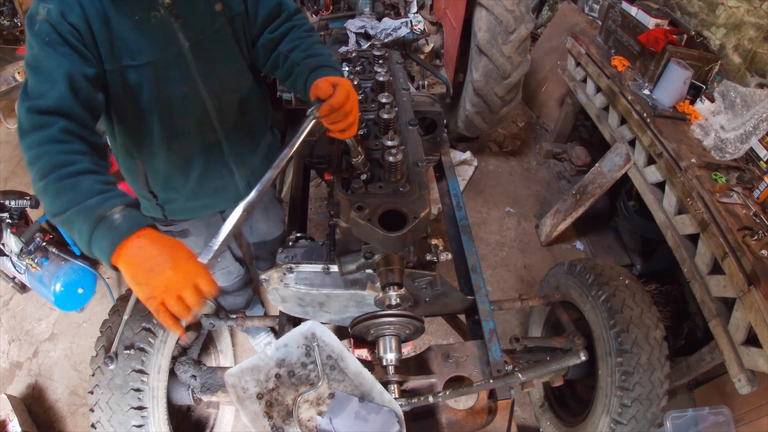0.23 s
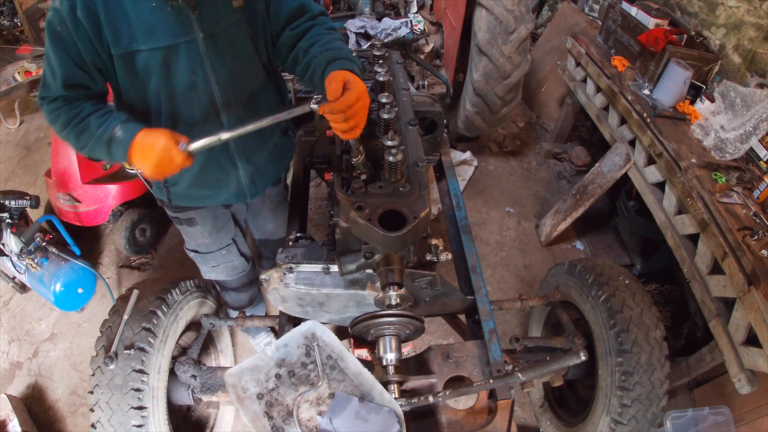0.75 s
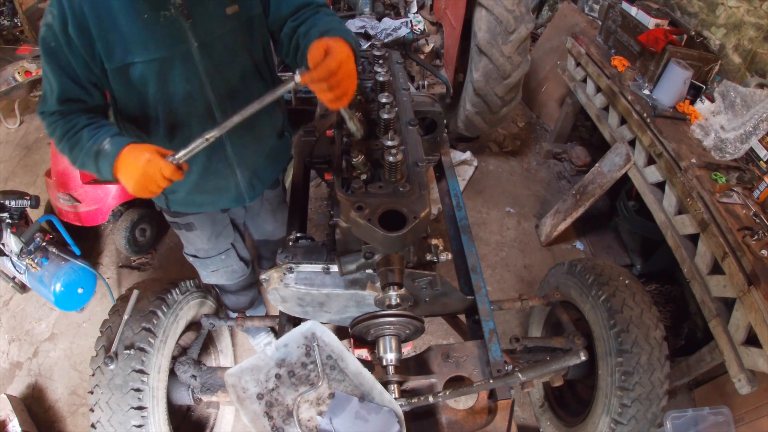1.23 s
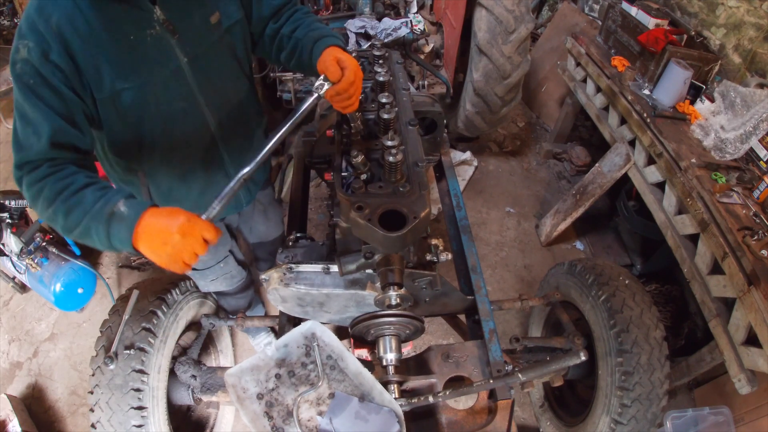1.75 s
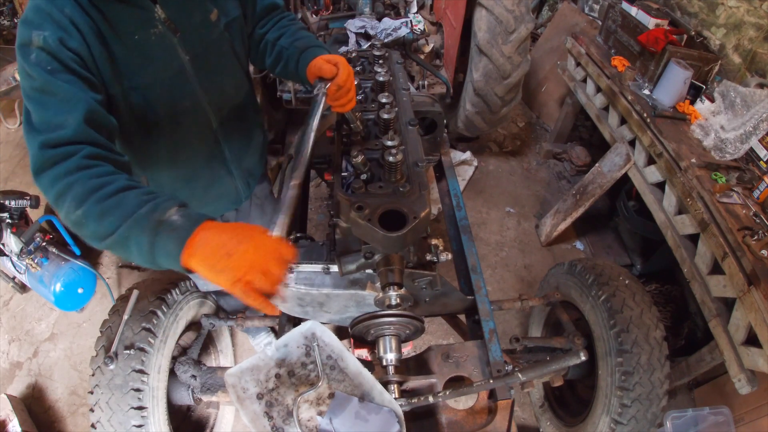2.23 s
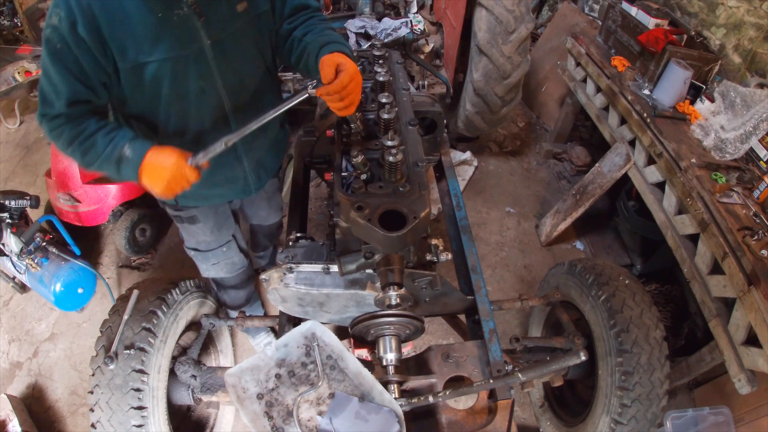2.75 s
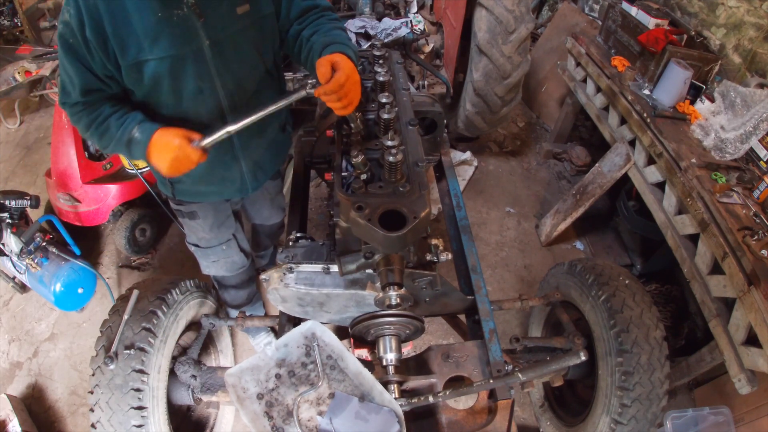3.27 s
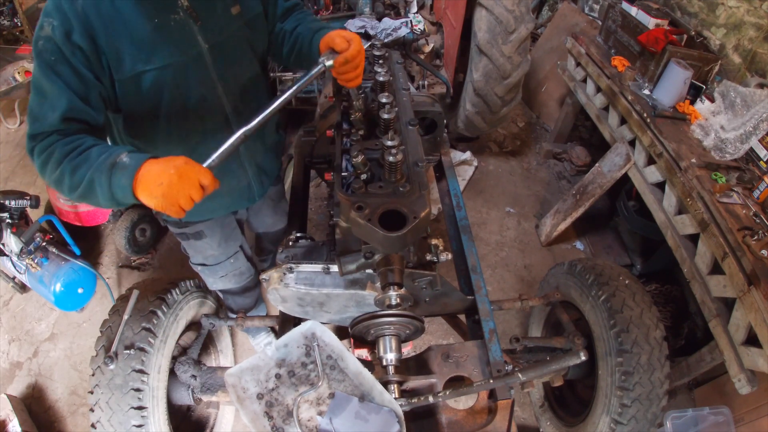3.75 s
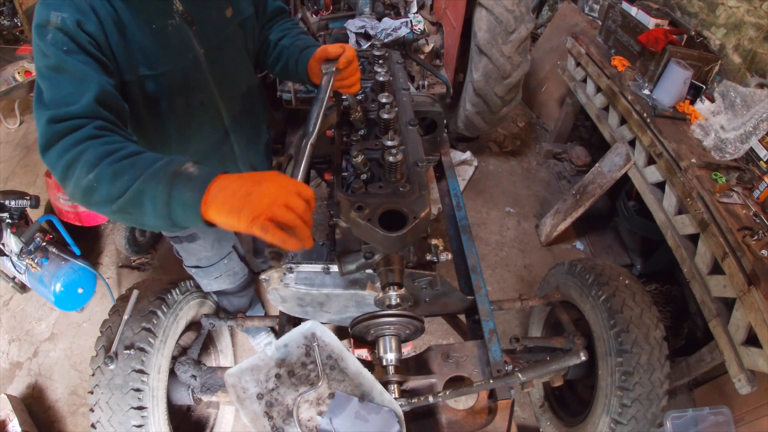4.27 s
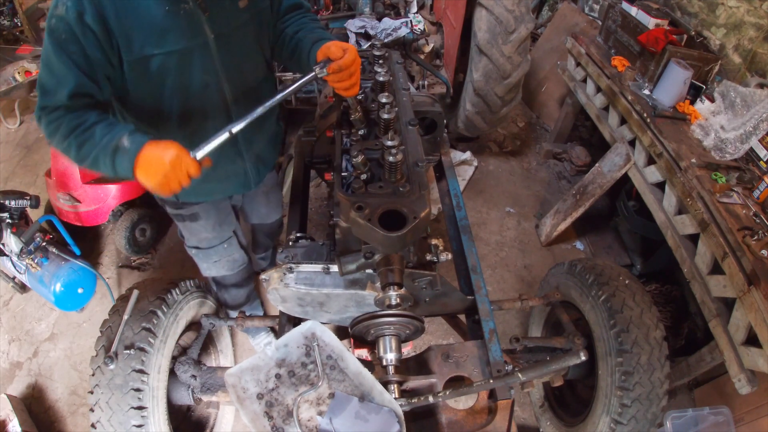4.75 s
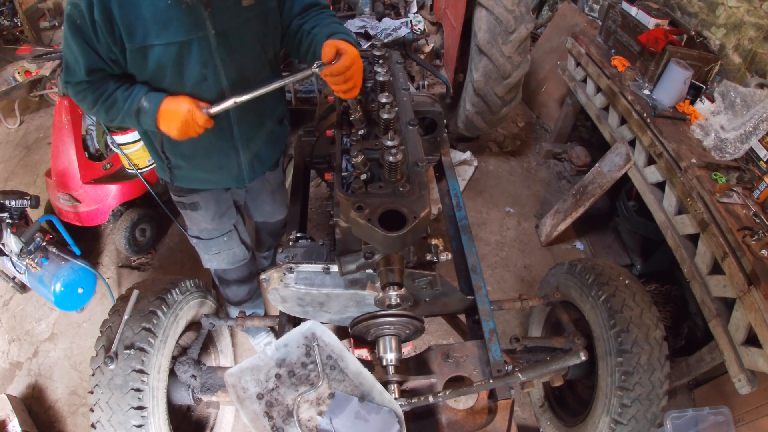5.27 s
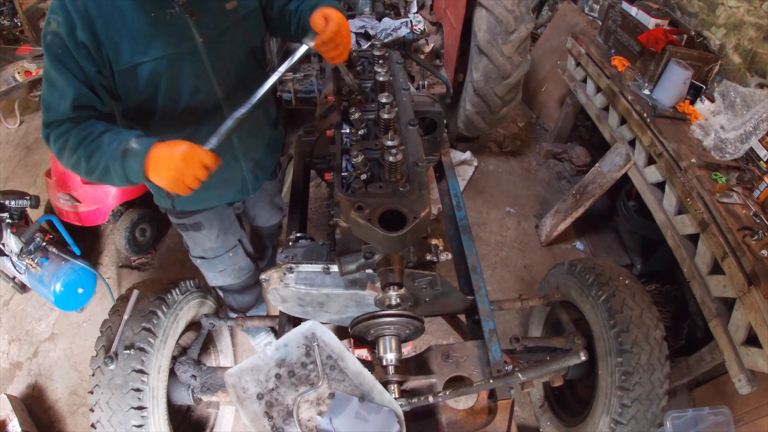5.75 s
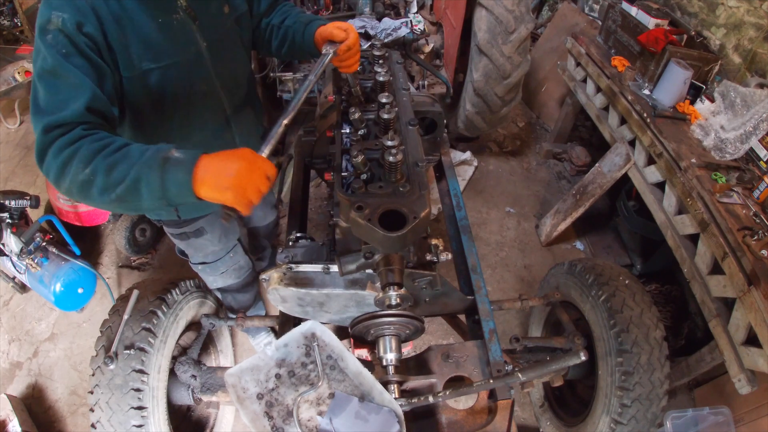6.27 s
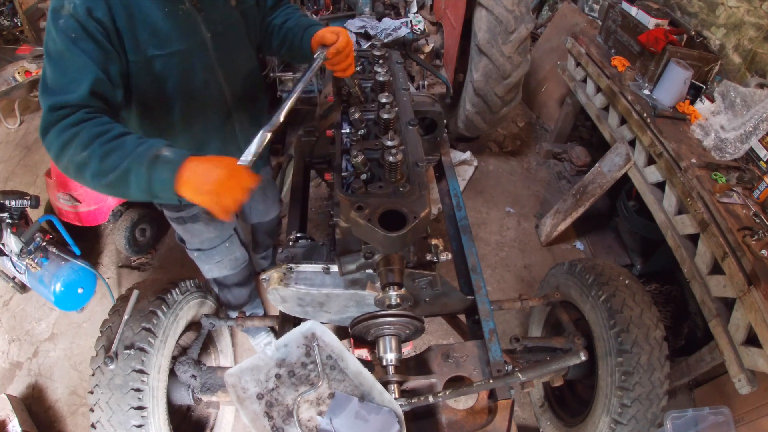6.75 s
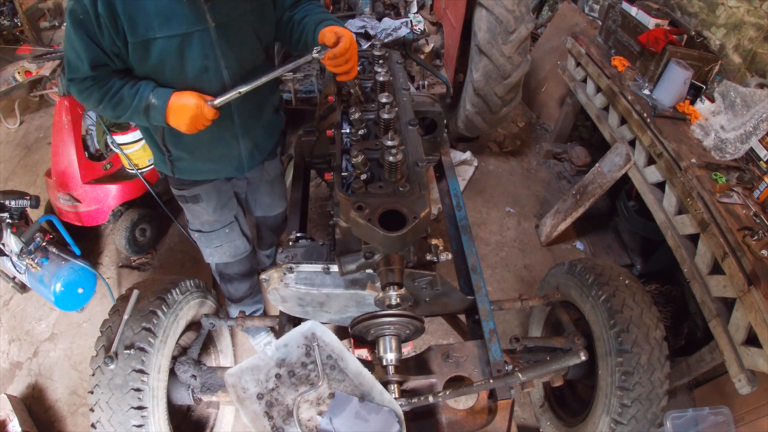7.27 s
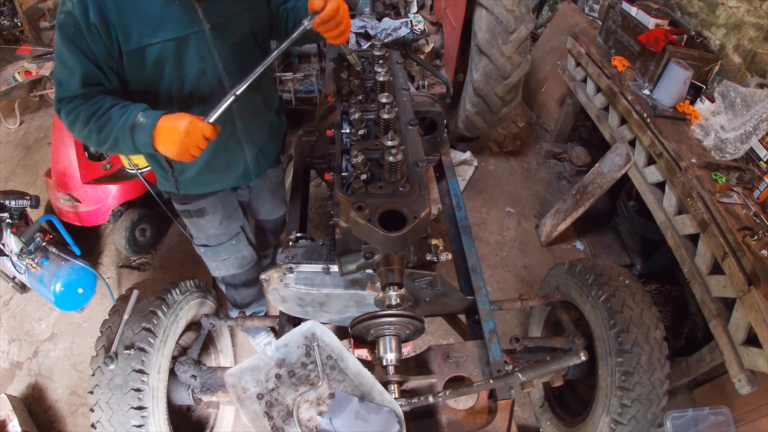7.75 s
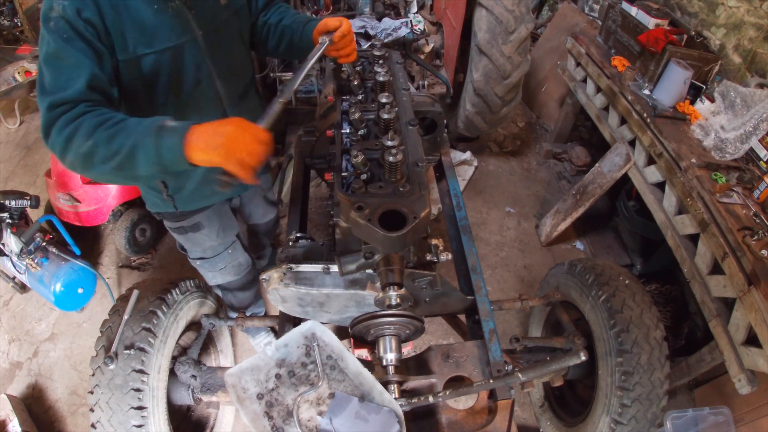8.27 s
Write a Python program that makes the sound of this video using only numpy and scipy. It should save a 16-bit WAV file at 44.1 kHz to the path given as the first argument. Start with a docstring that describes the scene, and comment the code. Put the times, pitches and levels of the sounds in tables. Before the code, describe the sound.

Steel clicks and crunchy clinks come in five short bursts as a socket is set on engine nuts and a long wrench ratchets and clicks over. Dull booms from the chassis sit under many of the hits, and soft cloth rustle fills the pauses. The work is heard from a couple of steps away in a shed with a short echo, with thin falling bird whistles, light hiss and very faint high ticking behind.

```python
"""A long torque wrench tightens the head nuts of a tractor engine in a shed, two steps away.
The socket clinks onto each nut, the ratchet takes up and the wrench clicks over: steel contacts that
crunch, ring and echo. The jolts boom through the chassis, and a sleeve rustles as the arm swings.
Small birds whistle outside, over open-air hiss and a faint high ticking; a low tone wavers once."""
import sys
import numpy as np
from scipy import signal
from scipy.fft import rfft, irfft, next_fast_len
from scipy.io import wavfile
from scipy.ndimage import uniform_filter1d

SR = 44100
rng = np.random.default_rng(int(sys.argv[2]) if len(sys.argv) > 2 else 0)


def wav_out(sig):
    """Save sig, one row per channel (or a flat mono array), as 16-bit PCM at SR to the path in sys.argv[1]."""
    wavfile.write(sys.argv[1], SR, np.round(np.clip(np.atleast_2d(sig).T, -1, 1) * 32767).astype(np.int16))


N = 375320
T = np.arange(N) / SR


def undb(db):
    """Decibels to gain."""
    return 10 ** (np.asarray(db) / 20)


def unit_rms(x):
    """Scale to rms 1."""
    return x / np.sqrt(np.mean(x ** 2))


def unit_energy(x):
    """Scale to energy 1."""
    return x / np.sqrt(np.sum(x ** 2))


def add(out, x, start_s):
    """Mix x into out from start_s."""
    i = max(0, int(start_s * SR))
    out[i:i + len(x)] += x[:N - i]


def decay(t, t60_s):
    """Exponential fall, 60 dB in t60_s."""
    return np.exp(-np.log(1000) * t / t60_s)


def wander(rate_hz):
    """Random steps, smoothed twice; spread near 1."""
    hold = int(SR / rate_hz)
    steps = np.repeat(rng.standard_normal(N // hold + 1), hold)
    return 1.3 * uniform_filter1d(uniform_filter1d(steps, hold), hold)[:N]


def band_centres(edges_hz):
    """Geometric centre of each band."""
    return np.sqrt(np.multiply(edges_hz[1:], edges_hz[:-1]))


def db_at(hz, curve):
    """Read a (Hz, dB) curve on a log-frequency axis."""
    knots_hz, db = np.transpose(curve)
    return np.interp(np.log(hz), np.log(knots_hz), db)


def colour(x, curve):
    """Minimum-phase filter along a (Hz, dB) curve."""
    size = 2 * next_fast_len(len(x) // 2 + 1024)
    gain_db = db_at(np.fft.rfftfreq(size, 1 / SR) + 1, curve)
    cepstrum = irfft(np.log(undb(gain_db)))
    cepstrum[1:size // 2] *= 2
    cepstrum[size // 2 + 1:] = 0
    return irfft(rfft(x, size) * np.exp(rfft(cepstrum)))[:len(x)]


def set_bands(x, edges_hz, levels_db):
    """Filter a blow towards the given band levels (energy spread over 50 ms)."""
    edge_bins = np.array(edges_hz) * len(x) // SR
    for _ in range(2):
        power_below = np.cumsum(np.abs(rfft(x)) ** 2) * 2 / len(x) / (.05 * SR)
        have_db = 10 * np.log10(np.diff(power_below[edge_bins]))
        x = colour(x, np.c_[band_centres(edges_hz), levels_db - have_db])
    return x


def resonate(x, hz, width_hz):
    """Two-pole resonance, gain 1 at its centre."""
    return signal.lfilter(*signal.iirpeak(hz, hz / width_hz, fs=SR), x)


def ring(t, modes, scatter_db, detune):
    """Decaying modes; each blow lands elsewhere and shifts their strength and pitch a little."""
    hz, db, t60_s = np.transpose(modes)[:, :, None]
    strength, shift = rng.standard_normal((2, len(modes), 1))
    sines = np.sin(2 * np.pi * hz * (1 + detune * shift) * t)
    return np.sum(undb(db + scatter_db * strength) * decay(t, t60_s) * sines, axis=0)


def shed_echoes(t, contact_s, split_hz=2000, onset_s=.005):
    """A few strong echoes off engine and floor, then a dense tail whose treble dies first."""
    low = signal.sosfilt(signal.butter(2, split_hz, fs=SR, output="sos"), rng.standard_normal(len(t)))
    highpass = signal.butter(2, split_hz, "high", fs=SR, output="sos")
    high = signal.sosfilt(highpass, rng.standard_normal(len(t)))
    tail = undb(3) * low * decay(t, t60_s=.35) + high * decay(t, t60_s=.25)
    arrivals = rng.standard_normal(len(t)) ** 2 * (rng.random(len(t)) < .02)
    # each echo lasts as long as the contact
    early_power = signal.lfilter([1], [1, -np.exp(-2 / contact_s / SR)], arrivals)
    early = unit_rms(rng.standard_normal(len(t)) * np.sqrt(early_power))
    echoes = tail + undb(2.5) * early * decay(t, t60_s=.12)
    return echoes * np.clip(2 * t / onset_s - 1, 0, 1)


# Wrench, socket and nut ringing together. Each row: mode in Hz, relative level in dB, t60 in seconds.
STEEL_MODES = [(1210, -3, .2), (1349, 0, .28), (1550, -1, .22), (1675, -4, .2), (2181, -5, .18),
               (2950, -5, .14), (3390, -7, .14), (3713, 2, .24), (3886, 1, .24), (4330, -8, .16),
               (5030, 0, .2), (5166, 2, .26), (5590, 0, .28), (5656, -2, .24), (7580, -2, .34),
               (8700, -3, .22)]
# Spectrum of a typical contact. Each row: frequency in Hz, level offset in dB.
CONTACT_SPECTRUM = [(600, -7), (1350, -2.5), (2250, -1), (3500, 0), (5200, -3.5), (7000, -7), (9200, -10.5)]
# Band edges of a contact in Hz.
CONTACT_EDGES_HZ = [350, 1000, 1800, 2800, 4400, 6200, 8000, 10500]
# Steel contacts. Each row: start in seconds, base level in dB, contact time in ms, room share in dB,
# free ring in dB, low clang in Hz, high clang in Hz, clang gain in dB, body in dB per octave below
# the pivot, brightness in dB per octave above it.
CONTACTS = [(0., -44.5, 2.3, 1, -10, 3000, 4300, 8, -2.5, 5.5),
            (.065, -38, 4, 1, -22, 2010, 3770, -9, -7.5, -7.5),
            (.08, -40.5, 3.2, -6, -25, 2060, 3560, 3, 2, 3),
            (.087, -48.5, 2.5, -4, -20, 500, 3600, 4, 6.5, 0),
            (0.253, -60.5, 2.9, 5, -20, 2080, 4530, 3, 5, 3),
            (.595, -56, 1.4, 3, -18, 2670, 4020, 1, -8, 0),
            (1.13, -49.5, 2.5, 2, -23, 3530, 7000, 2, -1, 4),
            (1.149, -45.5, 6.2, -2, -20, 1820, 3600, -3, -4.5, -10),
            (1.616, -39.5, 4.8, 3.5, -11, 2380, 8900, 5.5, -1.5, 0),
            (1.7748, -46, 2.6, -8, -20, 2300, 4900, 5, -6, 3),
            (1.777, -34.5, 2.2, 2.5, -7, 4780, 6600, 10, 2, 5),
            (1.998, -28, 1.6, -3.5, -18, 1240, 8750, 0, -1.5, 7.5),
            (2.0057, -40, 3.2, 3.5, -13, 1250, 7300, 3, 7, 12),
            (2.124, -46.5, 4.5, -7.5, -20, 3260, 4300, 8, -11, 2),
            (2.158, -33.5, 2.3, -6.5, -15.5, 2780, 4230, 3.5, -8, 3),
            (2.37, -59, 2.6, -1, -20, 2070, 5540, -3, 4, 0),
            (3.27, -45.5, 5.6, 3, -23, 1790, 3690, -2, 2.5, 4.5),
            (3.892, -29, 3, 4, -1.5, 5020, 5620, 6, -2.5, -1),
            (4.009, -23.5, 0.99, -6.5, -20, 1490, 1600, 6, -5, 2.5),
            (4.0189, -37, 0.97, .5, -25, 1610, 5650, 8, 4, 7.5),
            (4.14, -33.5, 2.8, -2, -31, 3430, 9170, -5, 3.5, 7.5),
            (4.362, -56, 5.9, 12, -24, 2030, 2630, -8, 4.5, -6),
            (4.5296, -54.5, 2.9, -4, -17, 2090, 3370, 3, 2.5, -2),
            (5.449, -46.5, 3.4, 2, -22, 2250, 3930, -2, 2.5, 0),
            (5.9, -38.5, 1.8, -5.5, -10, 1280, 1360, 13, 0.5, -2.5),
            (5.916, -46.5, 1.6, 0, -26, 1300, 3700, 2, 6.5, 1),
            (5.9761, -37.5, 1.4, -3, -21, 3560, 8860, 13.5, 0.5, 4.5),
            (6.132, -51, 8, 5, -20, 1440, 3270, 0, 5.5, -5),
            (6.205, -37.5, 2, -1.5, -13, 1350, 3940, 0.5, 0, 4),
            (6.215, -42.5, 0.93, -2.5, -28, 1380, 4050, 0, 2.5, 6.5),
            (6.283, -41.5, 2, -2.5, -12, 1540, 3820, 5, 0, -2),
            (6.292, -41, 3.3, -5, -22, 1510, 6760, -1, 4.5, -3.5),
            (6.402, -53.5, 1.5, -4, -20, 1350, 2690, -2, 0.5, -3),
            (6.42, -51.5, 4.2, -1, -16, 1340, 2730, 2.5, .5, -2),
            (6.437, -52, 3.7, 1, -17, 1300, 2770, 1, 6.5, -0.5),
            (6.517, -47, 2.3, -1, -13, 3050, 9000, -3, -11, -0.5),
            (6.5947, -33.5, 1.5, -4.5, -18, 2920, 3400, 0.5, -6, 1.5),
            (6.76, -50.5, 8.8, -4, -21, 1230, 3670, -5, 3.5, -2),
            (7.558, -48.5, 1.7, 6, -16, 1670, 4300, -15, 2, 2),
            (8.081, -40, 3, 1.5, -29, 1260, 3700, -3, -0.5, -7.5),
            (8.156, -33, 12, -2, -26, 2090, 4530, -3, -2, 1.5),
            (8.1666, -35, 1.1, -3, -6, 2010, 6040, 11, -1.5, 4),
            (8.258, -43, 1.8, 2, -20, 1520, 4300, 1, 1, 0),
            (8.2735, -33, 1.9, -2, -15, 1460, 6670, 0.5, 2.5, 6.5),
            (8.39, -55.5, 7.3, 7, -18, 2230, 2920, -3, 8, 2.5),
            (8.431, -50, 1.9, -1, -20, 2220, 2940, -1, -2, 6),
            (8.446, -29, 4.6, -5, -15, 2120, 2940, 0, -8.5, 2)]


def wrench(rise_s=.00059, floor_echo_s=.0095, floor_echo_db=-13, clack_db=-16.5, shaft_db=-5.5,
           pivot_hz=3040):
    """Each contact is a crunch of steel: a clack while the parts press together, then a thin free ring."""
    out, t = np.zeros(N), np.arange(SR // 2) / SR
    bands_hz = band_centres(CONTACT_EDGES_HZ)
    octaves = np.log2(bands_hz / pivot_hz)
    hit_curve = [(80, -18), (210, 0), (300, 1.5), (420, -8), (560, -2), (760, 3), (1200, 5), (9600, 3),
                 (10700, -14.5), (15000, -24.5)]
    for start_s, db, contact_ms, room_db, ring_db, *clangs_hz, clang_db, body_db, bright_db in CONTACTS:
        contact_s = contact_ms / 1000
        envelope = np.exp(-t / contact_s) * (1 - np.exp(-t / rise_s))
        crunch = unit_energy(rng.standard_normal(len(t)) * envelope)
        # a quick echo off the floor repeats the crunch
        add(crunch, undb(floor_echo_db) * crunch[:SR // 4], floor_echo_s)
        clack = unit_energy(ring(t, STEEL_MODES, scatter_db=3, detune=.04) * decay(t, t60_s=.015))
        free_ring = unit_energy(ring(t, STEEL_MODES, scatter_db=1.5, detune=.002))
        room = unit_energy(shed_echoes(t, contact_s))
        hit = crunch + undb(clack_db) * clack + undb(ring_db) * free_ring + undb(room_db) * room
        hit += undb(shaft_db) * resonate(hit, hz=1400, width_hz=250)
        hit = colour(hit, hit_curve)
        # weight behind a contact adds body, a hard edge adds brightness
        slope_db = np.where(octaves < 0, body_db, bright_db) * np.abs(octaves)
        hit = set_bands(hit, CONTACT_EDGES_HZ, db + db_at(bands_hz, CONTACT_SPECTRUM) + slope_db)
        # grip and seating of the socket set which resonances stand out
        clang = sum(resonate(hit, hz, width_hz=100 + .066 * hz) for hz in clangs_hz)
        add(out, hit + undb(clang_db) * clang, start_s)
    return out


# Open-air noise. Each row: frequency in Hz, relative density in dB.
AIR_SPECTRUM = [(25, -5.5), (45, 3), (80, -14), (110, -12), (170, 6), (260, -2.5), (400, -13.5), (550, -11),
                (790, -2), (1050, -9.5), (1700, -10), (3200, -18.5), (6300, -15), (9000, -20), (11000, -31),
                (16000, -57)]


def air(level_db=-55):
    """Quiet open-air hiss and rumble."""
    noise = unit_rms(colour(rng.standard_normal(N), AIR_SPECTRUM))
    return noise * undb(level_db + .5 * wander(rate_hz=3.105))


def ticking(level_db=-59, pitch_hz=6700, width_hz=1300, length_s=.014, count=200):
    """Very faint, fast, high ticking in the distance."""
    out, window = np.zeros(N), np.hanning(int(length_s * SR))
    for k, (jitter, detune, strength) in enumerate(rng.uniform(-1, 1, (count, 3))):
        hz = pitch_hz * (1 + .08 * detune)
        noise = rng.standard_normal(len(window))
        tick = resonate(resonate(noise, hz, width_hz), hz, width_hz)
        start_s = (k + .5 + jitter / 4) / count * N / SR
        add(out, undb(level_db + 4.6 * strength) * unit_rms(tick) * window, start_s)
    return out


# Boom of chassis and shed. Each row: mode in Hz, relative level in dB, t60 in seconds.
BOOM_MODES = [(38, -12, .42), (47, -7, .38), (62, -6, .38), (90.5, 0, .56), (121, -12, .3), (158, -2, .4),
              (209, -10, .42), (275, -19, .4), (294, -14, .35)]
# Spectrum of a typical jolt. Each row: frequency in Hz, level offset in dB.
JOLT_SPECTRUM = [(36, 1.5), (62, 5), (100, 1), (210, -1)]
# Band edges of a jolt in Hz.
JOLT_EDGES_HZ = [25, 52, 75, 125, 350]
# Jolts. Each row: start in seconds, base level in dB, tilt in dB per octave, main boom gain in dB.
CHASSIS_JOLTS = [(0.061, -24.5, 2.5, 10.5), (.308, -39.5, -3, -8.5), (1.129, -49, 0.7, 2.5),
                 (1.619, -38, 1, 2), (1.776, -39.5, 6.5, 4), (2, -26, 1.8, 13.5), (2.389, -40.5, -2, 4.5),
                 (3.274, -39.5, -3, 16), (3.369, -53.5, 9.5, 1), (3.895, -38.5, 3.5, -2.5),
                 (4.014, -38, 2.5, 4.5), (4.139, -37, -3.5, 10.5), (4.279, -46, 3.5, 9),
                 (4.426, -45, 2.6, -2), (4.537, -35.5, -2, 2.5), (4.648, -45.5, .5, 4),
                 (5.454, -51, 1.5, 11), (5.978, -45.5, 0, 15.5), (6.111, -44.5, 2, 5.5),
                 (6.206, -47, 7.5, 0), (6.296, -41, 2, 12.5), (6.435, -45, .6, 2), (6.781, -36, -5, 2.5),
                 (7.556, -49, 5, 5.5), (8.166, -43.5, 6, 6.5), (8.279, -37.5, 2, 4), (8.4, -45, 5.5, -10)]


def chassis(push_s=.0051, main_hz=96, main_width_octaves=.3, rumble_db=-4):
    """A jolt swells into the low modes over a dull rumble; its direction sets the main mode's boom."""
    out, t = np.zeros(N), np.arange(SR) / SR
    bands_hz = band_centres(JOLT_EDGES_HZ)
    octaves = np.log2(bands_hz / main_hz)
    main_mode = np.exp(-(octaves / main_width_octaves) ** 2)
    swell = 1 - np.exp(-(t / push_s) ** 2)
    rumble_curve = [(15, -27), (28, -4.5), (44, -6), (110, -3), (220, -8.5), (330, -23.5), (500, -27.5),
                    (2000, -66)]
    for start_s, db, tilt_db, boom_db in CHASSIS_JOLTS:
        rumble = colour(rng.standard_normal(len(t)), rumble_curve) * decay(t, t60_s=.36)
        boom = unit_energy(ring(t, BOOM_MODES, scatter_db=1, detune=.004))
        jolt = (boom + undb(rumble_db) * unit_energy(rumble)) * swell
        slope_db = tilt_db * (octaves - octaves.mean())
        levels_db = db + db_at(bands_hz, JOLT_SPECTRUM) + slope_db + boom_db * main_mode
        add(out, set_bands(jolt, JOLT_EDGES_HZ, levels_db), start_s)
    return out


# Rustle of cloth. Each row: frequency in Hz, relative density in dB.
CLOTH_SPECTRUM = [(100, -3.5), (250, 5), (700, -6.5), (1500, -1), (3000, -7), (6000, -11.5), (9300, -14),
                  (11000, -31), (16000, -43)]
# Arm swings. Each row: fastest moment in seconds, swell in seconds, fade in seconds, level in dB.
ARM_SWINGS = [(.38, 0.2, 1, -50), (2.33, 0.36, 0.29, -54), (3.3, 0.39, 0.14, -47.5),
              (4.55, .15, 0.55, -51.5), (5.58, 0.22, 0.24, -47.5), (6.4, 0.41, 1, -52),
              (7.95, 0.35, 0.36, -51.5)]


def sleeve(patchy_db=2):
    """Cloth brushes in uneven patches, swelling and fading with each swing of the arm."""
    cloth = unit_rms(colour(rng.standard_normal(N), CLOTH_SPECTRUM))
    power = np.zeros(N)
    for peak_s, swell_s, fade_s, db in ARM_SWINGS:
        tau_s = np.where(T < peak_s, swell_s, fade_s)
        power += (undb(db) * np.exp(-np.abs(T - peak_s) / tau_s)) ** 2
    return cloth * np.sqrt(power) * undb(patchy_db * wander(rate_hz=30))


def low_tone(start_s=.44, length_s=.41, first_hz=276, last_hz=254, level_db=-50):
    """A faint, wavering low tone during the first swing back."""
    progress = np.clip((T - start_s) / length_s, 0, 1)
    hz = (first_hz + (last_hz - first_hz) * progress) * (1 + .076 * wander(rate_hz=70))
    arch = np.sqrt(4 * progress * (1 - progress))
    gain = undb(level_db + 3.8 * wander(rate_hz=40.9))
    return gain * arch * np.sin(2 * np.pi * np.cumsum(hz) / SR)


# Bird whistles. Each row: start in seconds, length in seconds, first pitch in Hz, last pitch in Hz,
# upper voice's offset in Hz, level before echoes in dB.
BIRD_WHISTLES = [(1.845, 0.1, 5740, 4780, 500, -42), (3.579, 0.17, 5730, 4670, 493, -46),
                 (4.314, 0.31, 7750, 7500, 280, -55.5), (5.671, 0.14, 5790, 4900, 395, -44),
                 (7.117, 0.12, 5820, 4830, 401, -44), (7.299, 0.45, 7900, 7540, 247, -56.5)]


def birds(upper_db=-5.5, waver=.0054, echo_t60_s=.38, direct_gain=.22):
    """Thin, falling, two-voiced whistles, heard mostly by their echoes."""
    song = np.zeros(N)
    for start_s, length_s, first_hz, last_hz, offset_hz, db in BIRD_WHISTLES:
        progress = np.linspace(0, 1, int(length_s * SR))
        glide_hz = first_hz + (last_hz - first_hz) * progress
        voices = np.zeros(len(progress))
        for hz, gain in (glide_hz, 1), (glide_hz + offset_hz, undb(upper_db)):
            wavering_hz = hz * (1 + waver * wander(rate_hz=400)[:len(hz)])
            voices += gain * np.sin(2 * np.pi * np.cumsum(wavering_hz) / SR)
        arch = (4 * progress * (1 - progress)) ** .89
        add(song, undb(db) * unit_rms(voices * arch), start_s)
    t = T[:SR // 2]
    response = unit_energy(rng.standard_normal(len(t)) * decay(t, echo_t60_s))
    response[0] += direct_gain
    return signal.fftconvolve(song, unit_energy(response))[:N]


def scene():
    """All sources in mono, on both channels."""
    mono = wrench() + chassis() + sleeve() + birds() + ticking() + low_tone() + air()
    return np.array([mono, mono])


def record(dry, cutoff_hz=15700):
    """Clip at full scale, then cut the top steeply."""
    lowpass = signal.ellip(10, .2, 90, cutoff_hz, fs=SR, output="sos")
    return signal.sosfilt(lowpass, np.clip(dry, -1, 1))


dry = scene()
out = record(dry)
wav_out(out)
```